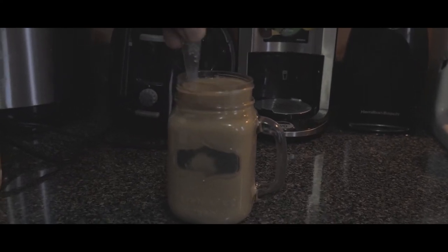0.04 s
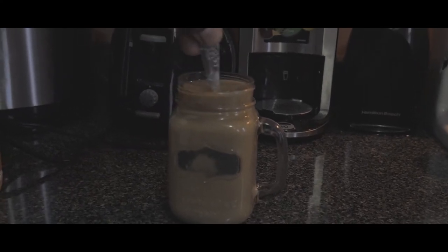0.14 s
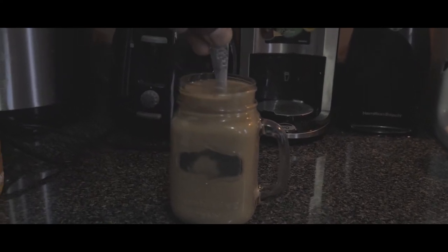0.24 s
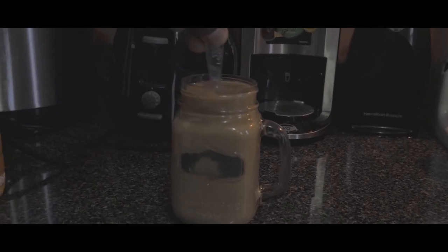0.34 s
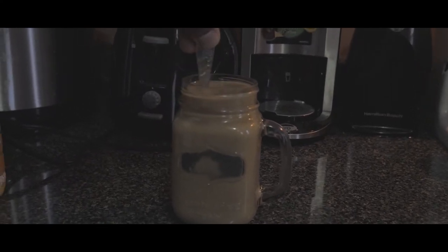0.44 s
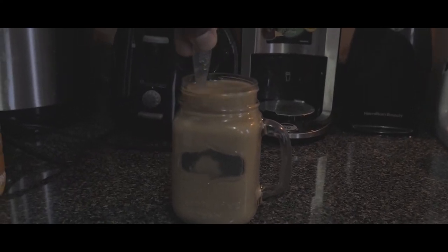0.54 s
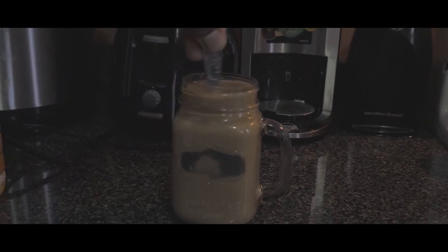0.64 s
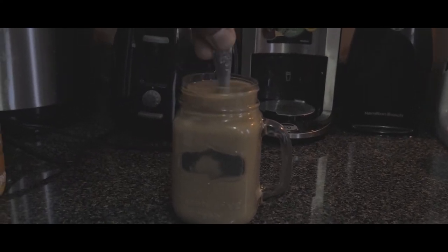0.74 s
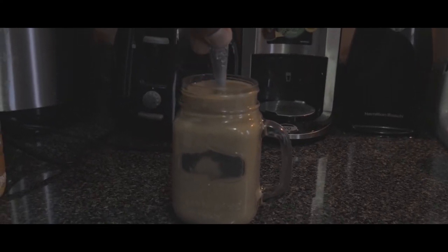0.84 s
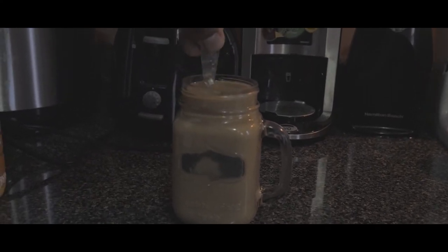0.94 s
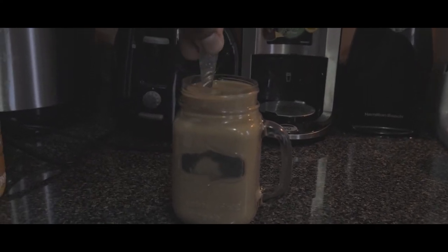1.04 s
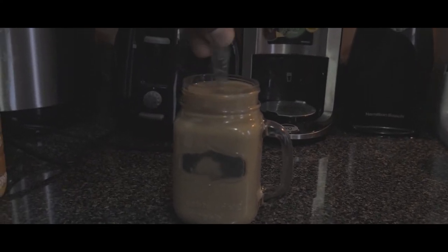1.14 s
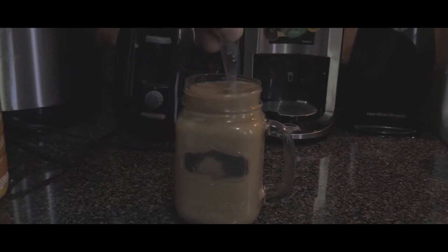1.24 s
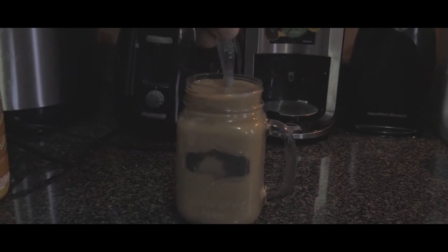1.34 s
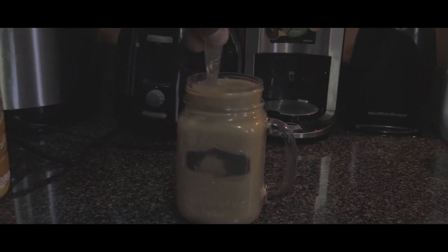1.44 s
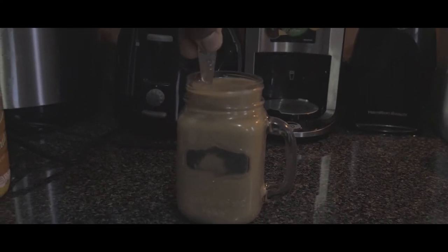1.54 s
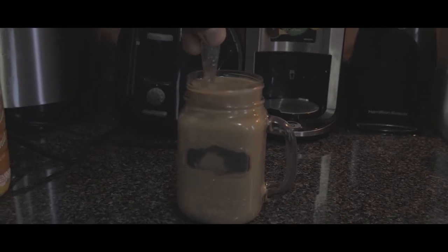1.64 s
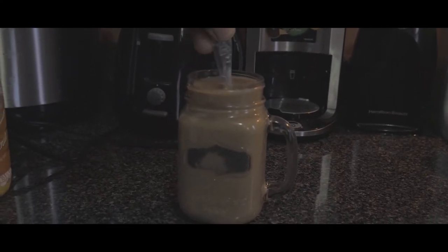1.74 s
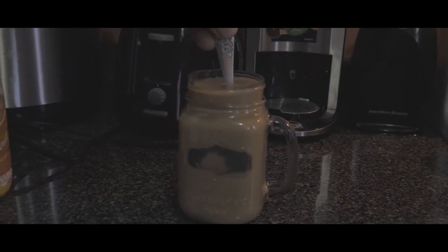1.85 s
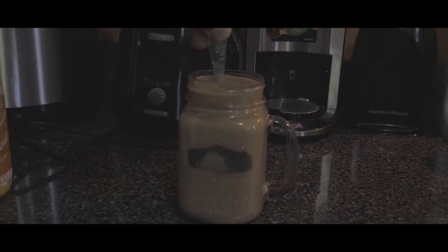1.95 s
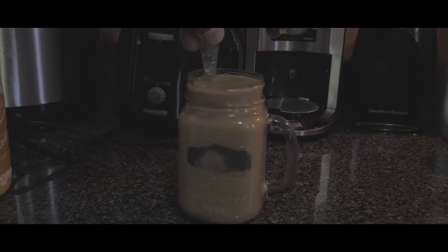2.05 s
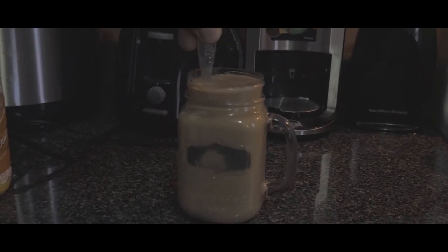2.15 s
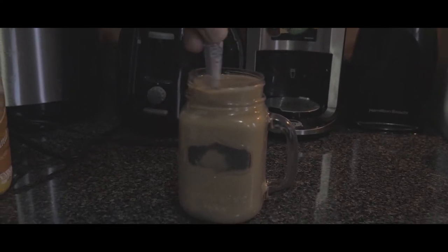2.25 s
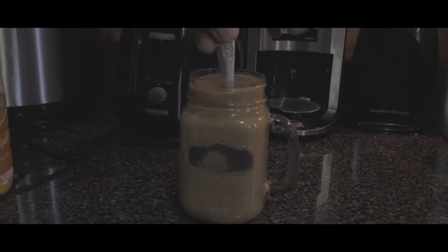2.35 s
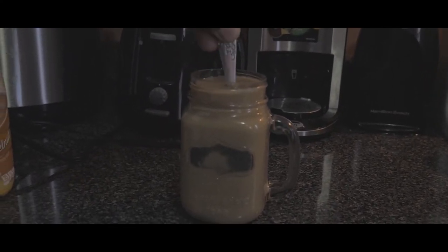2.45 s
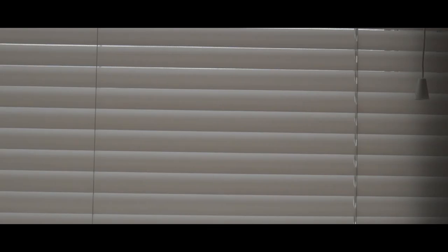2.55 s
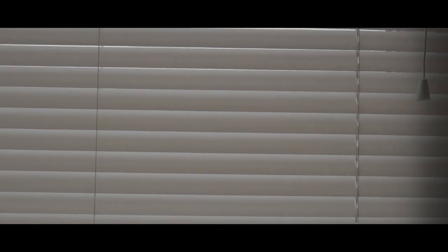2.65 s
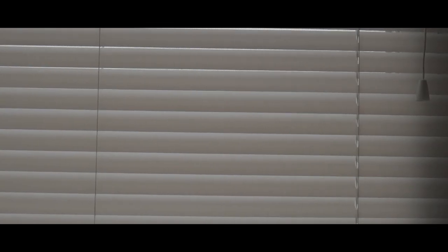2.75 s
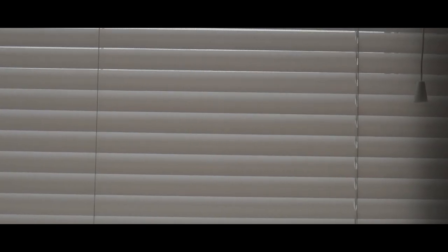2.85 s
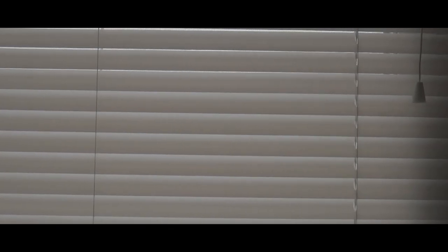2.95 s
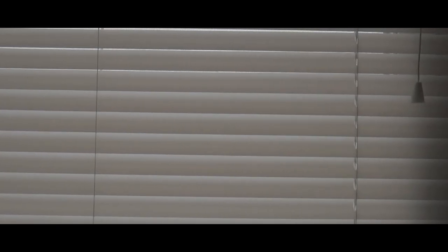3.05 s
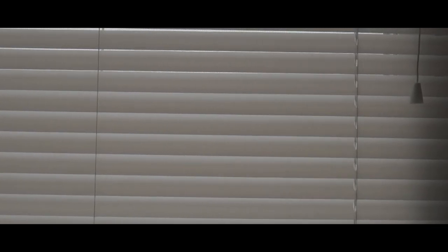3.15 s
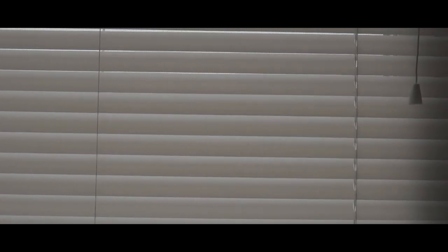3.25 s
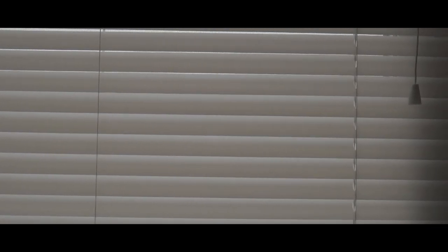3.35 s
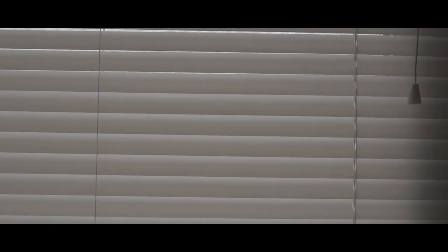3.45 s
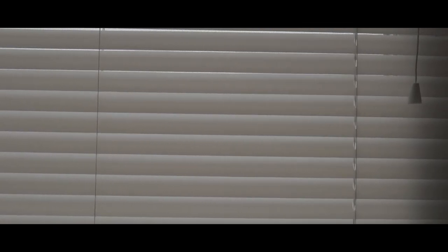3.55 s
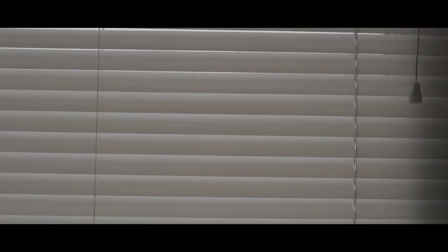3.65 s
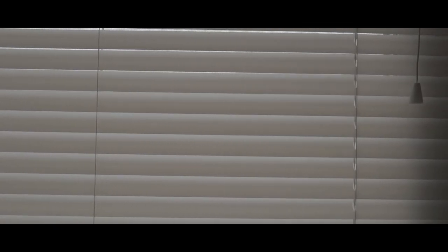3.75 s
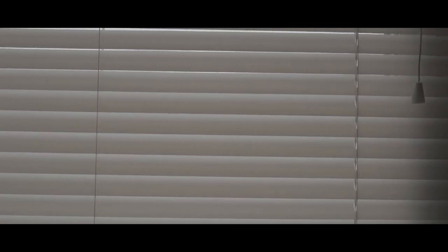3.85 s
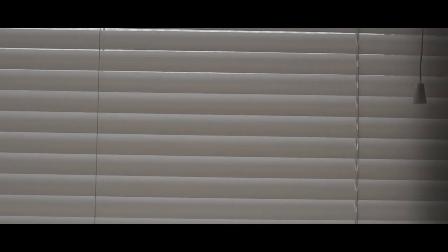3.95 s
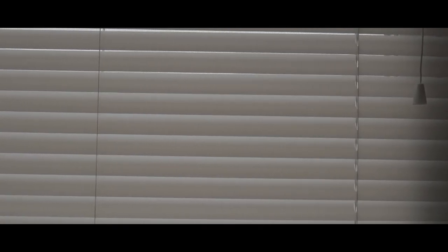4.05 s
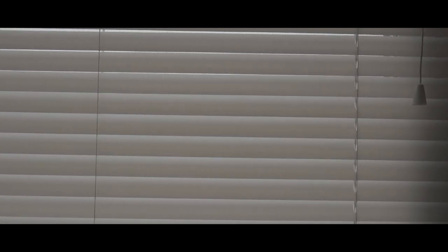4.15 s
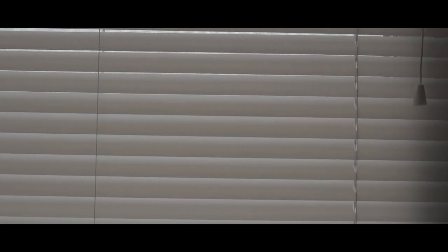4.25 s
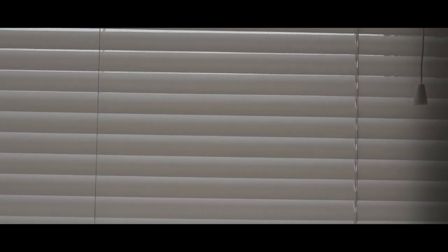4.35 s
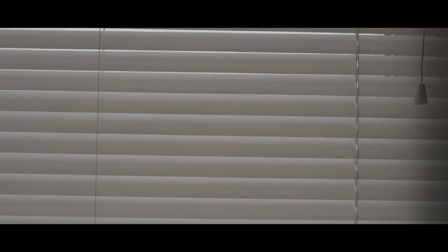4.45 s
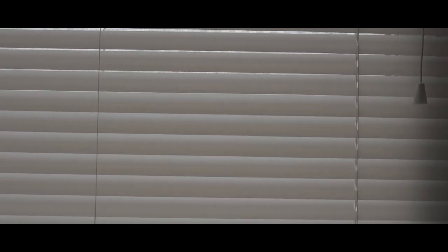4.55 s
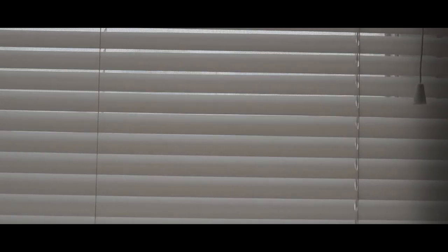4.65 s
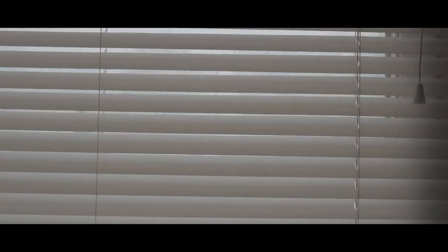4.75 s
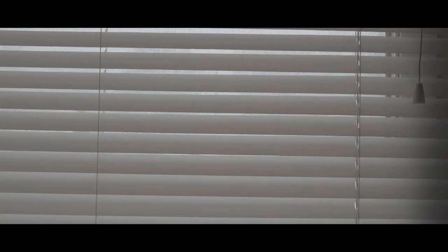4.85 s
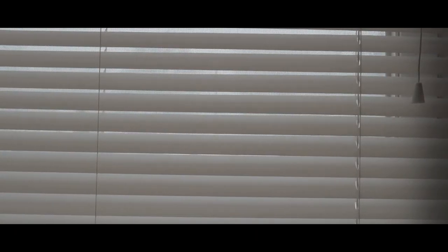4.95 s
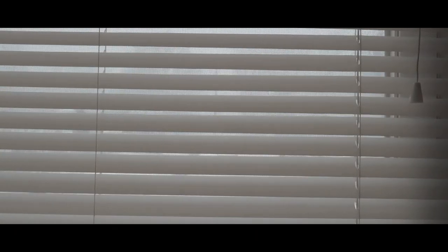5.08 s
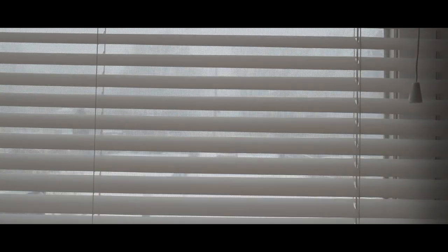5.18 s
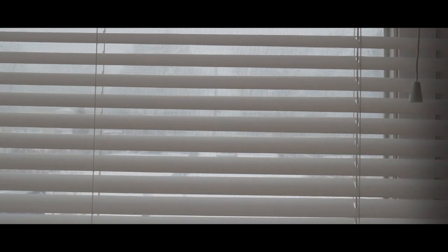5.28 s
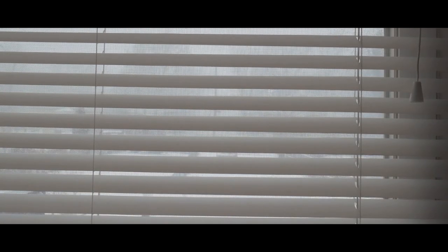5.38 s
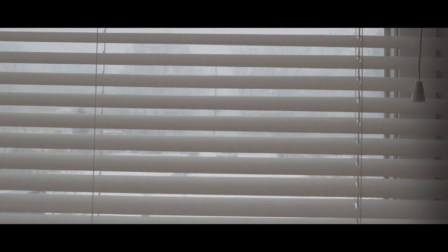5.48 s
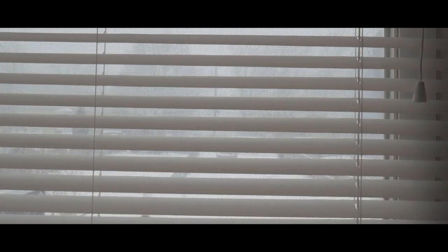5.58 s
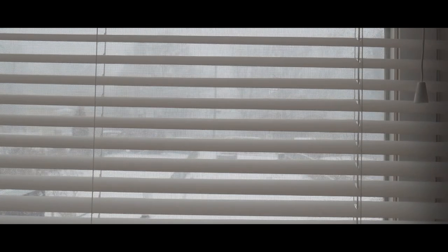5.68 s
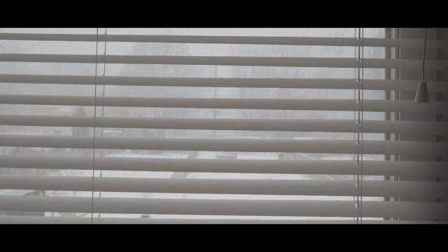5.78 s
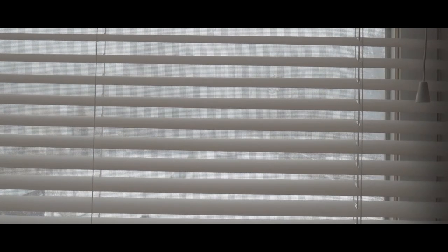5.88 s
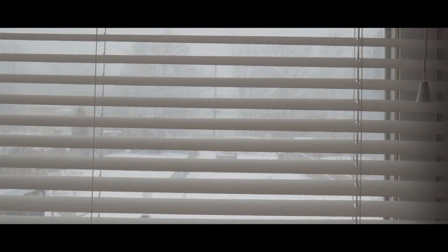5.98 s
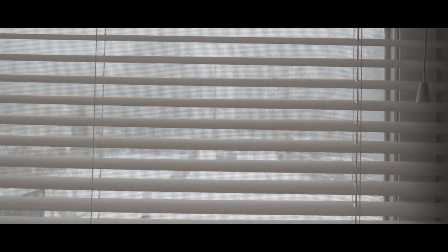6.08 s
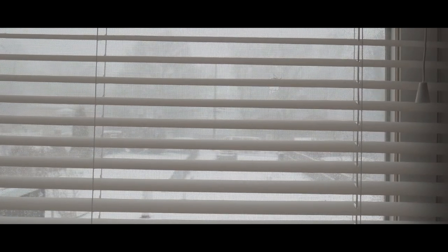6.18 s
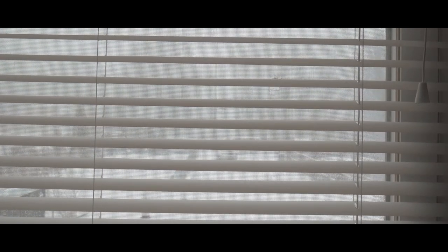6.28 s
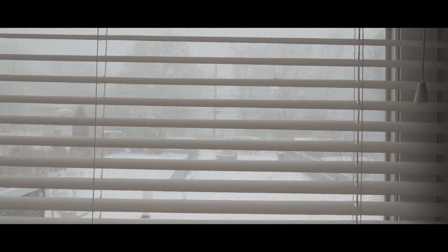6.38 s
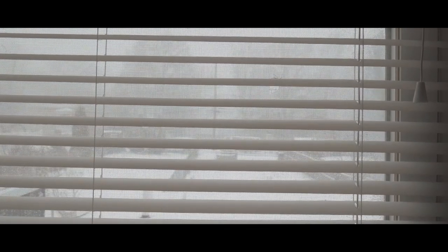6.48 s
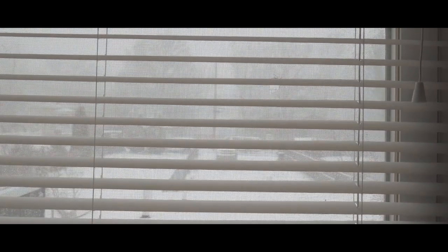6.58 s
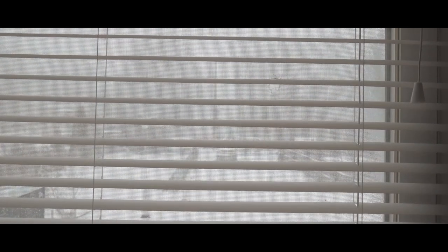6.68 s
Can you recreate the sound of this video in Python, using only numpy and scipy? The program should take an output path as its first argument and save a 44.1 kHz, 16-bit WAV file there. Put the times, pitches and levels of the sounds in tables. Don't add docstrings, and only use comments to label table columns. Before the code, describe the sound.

From 0 to 2.56 s, a metal spoon stirs a full glass mug, close and nearly central. A clink is already ringing at the start; strong, bright clinks follow at about 0.2, 0.5, 0.7, 1.2, 1.5, 1.8, 2.2 and 2.35 s, with weaker taps between. Each has a sharp crack, a short glassy ring and a dull wet knock. Brief gliding scrapes come at 1.1 and, firmer, 1.6 s. Soft sloshing hiss and deep counter rumble swell with the stirring, strongest near 1.8 s. An abrupt cut reveals a far quieter room: low, airy fan hum and a thin steady-pitched whine surging around 2.7-3.35, 4.8-5.1 and 5.65-6.4 s, with short blips between. Faint dry plastic slat ticks fall at 3.0, 3.3, 3.6, 4.5-4.6 and 5.2 s, then cluster from 6.1 to 6.66 s, slightly left, with a small room tail.

```python
import sys
import numpy as np
from scipy import signal
from scipy.fft import rfft, irfft, next_fast_len
from scipy.io import wavfile
from scipy.ndimage import uniform_filter1d, map_coordinates

SR = 44100
rng = np.random.default_rng(int(sys.argv[2]) if len(sys.argv) > 2 else 0)


def gain_from_db(level_db):
    decades = np.asarray(level_db, float) / 20
    return 10 ** decades


def materialize(psi):
    bounded = np.clip(np.atleast_2d(psi).T, -1, 1)
    quanta = np.round(bounded * 32767).astype(np.int16)
    wavfile.write(sys.argv[1], SR, quanta)


N = 296330

# fade_start_s, fade_end_s
SCENE_CHANGE = (2.557, 2.565)

# pitch_hz, level_db per Hz
ROOM_AIR = [(15, -47), (60, -19), (90, -13), (125, 0), (190, -9), (270, -8), (420, -14), (620, -18),
            (1000, -25), (1700, -26), (2800, -31), (5000, -37), (10000, -41), (15400, -47)]
# pitch_hz, likeness (1 = the same)
ROOM_AIR_LIKENESS = [(60, 1), (180, 0.65), (550, 0.06), (1650, 0.61), (4970, 0.68), (15000, 0.84)]
# pitch_hz, left_over_right_db
ROOM_AIR_LEFT = [(60, .3), (240, .9), (950, .5), (3770, 1.2), (15000, 1)]
ROOM_AIR_DB = -49.5
# pitch_hz, width_hz, level_db
FAN_TONES = [(118, 2.1, -100), (243, 15, -71), (2090, 15, -77.5)]
# start_s, length_s, level_db
WHINE_SURGES = [
    (2.707, 0.65, -60),
    (3.924, .03, -68),
    (4.12, .05, -66.5),
    (4.447, .15, -64),
    (4.774, 0.34, -61),
    (5.65, 0.72, -60.5),
    (6.68, 0.091, -61.5),
]
WHINE_REST_DB, WHINE_FADE_DB_PER_S = -71, 94

# time_s, effort_db
STIR_EFFORT = [(0.0, -57), (0.25, -60.5), (0.38, -54), (0.73, -52.5), (0.8, -74), (0.93, -53.5),
               (1.2, -54.5), (1.25, -61), (1.49, -50.5), (1.79, -42), (1.87, -57), (2.32, -51.5),
               (2.57, -57)]
# pitch_hz, level_db per Hz
COUNTER_RUMBLE = [(12, -45.5), (33, -16), (54, 4.5), (74, -2), (97, -11.5), (110, -17), (140, -46.5),
                  (240, -120)]
# pitch_hz, level_db per Hz
KITCHEN_HISS = [(100, -6), (170, -8), (300, -7), (550, -13.5), (1000, -15.5), (1400, -21.5), (3000, -22),
                (7500, -32), (12000, -41.5), (15500, -47.5), (16300, -91.5)]
# pitch_hz, time_to_die_s (60 dB down)
KITCHEN_ECHO = [(200, .3), (1500, 0.56), (4000, 0.56), (9000, 0.33), (15000, .2)]
SLOSH_DB, SLOSH_GROWS = -53, 0.13

# start_s, peak_db, low_part_db, top_part_db
SLAT_TICKS = [(3.037, -50, -5, -28), (3.0494, -61.5, 3.5, -15), (3.1492, -53.5, 0.5, -12),
              (3.3079, -41.5, -3, -18), (3.6212, -50, -23, -23), (4.1214, -66, 3.5, -13.5),
              (4.4982, -48.5, -5, -13.5), (4.5184, -56, 3.5, -13), (4.585, -39, -6, -8.5),
              (4.7466, -58.5, 0, -14), (4.8344, -58.5, -19.5, -8), (5.0274, -64.5, -2.5, -22.5),
              (5.2394, -47.5, -8.5, -5), (5.8874, -55, 0.5, -16), (6.0931, -46.5, -28.5, -2.5),
              (6.1205, -52, -25, -5.5), (6.2544, -53, -1.5, -5), (6.2961, -43.5, -8, -13),
              (6.3634, -62.5, 3, -3), (6.3994, -54.5, -17, -12), (6.4527, -45.5, 6, -0.5),
              (6.5834, -72, 8.5, -15), (6.6428, -55.5, -3, -15.5), (6.6594, -59, -7.5, 4)]
# pitch_hz, width_hz, level_db
SLAT_TONES = [(1633, 380, 1), (4006, 280, 5.5), (5960, 130, -1), (7600, 150, -11), (10300, 260, 2.5)]
# pitch_hz, time_to_die_s (60 dB down)
ROOM_ECHO = [(500, 0.21), (4000, 0.6), (12000, 0.157)]
TICK_DIES_S, TICK_LEFT_DB = 0.029, 2.5

# time_s, pressure_db, lean_db (from stem to bowl)
SPOON_DRAGS = [
    [(1.102, -52, -4.5), (1.113, -35, -7.5), (1.125, -32.5, 0.5), (1.155, -34, 4), (1.205, -49.5, 3)],
    [(1.585, -36.5, -5.5), (1.63, -33, -11), (1.645, -35, -3.5), (1.68, -26.5, 0), (1.715, -30, 2),
     (1.785, -49.5, -6)],
]
# pitch_hz, width_hz, level_db
EDGE_TONES = [(690, 97, 4.5), (1455, 600, -1), (3340, 79, 9), (3773, 130, 1.5), (4970, 90, 0.5),
              (6200, 70, 2.5), (7700, 390, -9), (8700, 200, -7.5), (10700, 300, -11.5), (12900, 250, -17.5),
              (14200, 250, -19)]
BOWL_HZ, BOWL_SAG_HZ_PER_S, STEM_HZ, STEM_SAG_HZ_PER_S = 1190, 350, 1960, 1100
FIZZ_DB, FIZZ_LEAN, WALL_DB, WALL_RING_S = -3, .8, 1.5, .06

# start_s, belly_db, second_belly_over_first_db, rim_db, knock_db
SPOON_CLINKS = [(-0.015, -29.5, 10.5, -24.5, -27.5), (0.1104, -64, -1.5, -62.5, -62.5),
                (0.1966, -16, -4.5, -3, -33), (0.4816, -10.5, -1, -17.5, -21),
                (0.5082, -21.5, -19, -26.5, -29), (0.5912, -21, -5.5, -29.5, -21),
                (0.7249, -14.5, -4, -3.5, -29), (0.961, -40, 0.5, -28.5, -30),
                (1.0201, -38.5, -7, -41, -28), (1.2196, -14.5, -7.5, -1.5, -29),
                (1.5, -15.5, 4.5, -14.5, -24.5), (1.5642, -17.5, 3, -13.5, -12.5),
                (1.8021, -12.5, -13.5, -5, -29.5), (2.047, -37, 2.5, -26.5, -21.5),
                (2.2121, -11.5, -8, -21, -19), (2.3301, -17.5, -12, -16.5, -19.5),
                (2.365, -16, 1.5, -4.5, -36.5)]
MUG_HZ = [2326, 2643, 3643, 3797, 4398, 4445, 4823, 5484, 5737, 5920, 6130, 6406, 6472, 6689, 7400, 7890,
          8054, 8355, 8580, 8765, 9200, 10060, 10860, 11400, 12250, 12800, 13400, 13850]
# level_db (within its family), time_to_die_s (60 dB down)
MUG_RINGS = [(-4, 0.34), (-11, 0.51), (2, 0.2), (-8, 0.4), (-10, 0.27), (-3, 0.31), (-20.5, .15),
             (-2, 0.14), (-9.5, 0.12), (-6.5, 0.33), (-6.5, 0.15), (-9.5, 0.26), (3, .2), (-4.5, 0.21),
             (-21, .2), (-18.5, 0.13), (-7, 0.084), (-14, 0.16), (-15, 0.088), (-7.5, 0.14), (-24.5, .2),
             (-20.5, 0.12), (-25.5, 0.3), (-32.5, .18), (-28, .15), (-35, .15), (-32, .1), (-31.5, .12)]
# pitch_hz, width_hz, level_db
WET_SPOON = [(255, 180, -18.5), (400, 66, -16), (643, 110, -11.5), (1008, 81, -8.5), (1267, 120, -12),
             (1330, 90, -10), (1743, 37, 0), (1775, 20, -4.5), (1877, 60, 1.5)]
# pitch_hz, width_hz, level_db
DRY_HANDLE = [(3400, 90, -2), (5290, 60, -3), (6040, 28, -1.5)]
# pitch_hz, width_hz, level_db
CLINK_SHEEN = [(3030, 800, -2.5), (3700, 300, -4.5), (4160, 200, -4), (5916, 200, -3), (6100, 220, 0.5),
               (5860, 560, 2.5), (7320, 880, -10), (7820, 230, 0.5), (8680, 250, 1), (10500, 82, -15),
               (10630, 540, -7.5), (12250, 80.6, -20.5), (13600, 180, -20)]
# pitch_hz, level_db per Hz
CRACK_COLOUR = [(88, -58.5), (150, -36), (1110, -24.5), (2940, -4), (4110, -14), (6320, 5.5), (7100, -17.5),
                (8640, 2.5), (9530, -12.5), (14400, -27.5), (16200, -32.5)]
CRACK_DIES_S = .0045
CRACK_DB, CRACK_GROWS, MIDDLING_DB = -2, 1.2, -12


def unit(x):
    return x / np.sqrt(np.mean(x ** 2) + 1e-20)


def peak_one(x):
    return x / (np.abs(x).max() + 1e-20)


def along(points, hz):
    point_hz, value = np.transpose(points)
    return np.interp(np.log(hz + 1), np.log(point_hz + 1), value)


def curves(rows):
    time_s, *columns = np.transpose(rows)
    return [np.interp(np.arange(N) / SR, time_s, column, -150, -150) for column in columns]


def wobble(rate):
    knots = rng.standard_normal(int(N * rate / SR) + 4)
    return map_coordinates(knots, [np.arange(N) * rate / SR])


def filtered(x, response):
    n = x.shape[-1]
    m = next_fast_len(n + 8192)
    return irfft(rfft(x, m) * response(np.fft.rfftfreq(m, 1 / SR)), m)[..., :n]


def resonances(modes):
    def response(f):
        total = 0
        for k, (hz, width, db) in enumerate(modes):
            total = total + (-1) ** k * gain_from_db(db) * 1j * f * width / (hz * hz - f * f + 1j * f * width)
        return total
    return response


def narrow(hz, width_hz):
    slow = filtered(rng.standard_normal((2, N)), lambda f: 1 / (1 + (2 * f / width_hz) ** 2))
    turn = 2 * np.pi * np.cumsum(hz * np.ones(N)) / SR
    return unit(slow[0] * np.cos(turn) + slow[1] * np.sin(turn))


def add(track, s, x):
    track[..., SR + round(s * SR):][..., :x.shape[-1]] += x


def echo(x, decays, channels):
    hz, t, z = signal.stft(rng.standard_normal((channels, SR // 2)), SR, nperseg=256)
    fading = z * gain_from_db(-60 * t / along(decays, hz)[:, None])
    tail = signal.istft(fading, SR, nperseg=256)[1]
    late = np.pad(x, (250, 0))[None]
    return signal.fftconvolve(late, tail / np.linalg.norm(tail[0]), axes=1)[:, :len(x)]


def surging():
    t = np.arange(N) / SR
    held = []
    for s, length, db in WHINE_SURGES:
        outside_s = np.maximum(np.abs(t - s - length / 2) - length / 2, 0)
        held.append(db - WHINE_FADE_DB_PER_S * outside_s)
    return np.maximum(np.max(held, axis=0), WHINE_REST_DB)


def quiet_room():
    def turn(hz):
        return np.arccos(np.clip(along(ROOM_AIR_LIKENESS, hz), -1, 1)) / 2

    def shape(hz):
        dip = 1 - 0.34 * np.exp(-((hz - 7870) / 60) ** 2)
        return gain_from_db(along(ROOM_AIR, hz)) * dip * (hz < 15500) * [np.cos(turn(hz)), np.sin(turn(hz))]

    z = signal.stft(rng.standard_normal((2, N)), nperseg=512)[2]
    patches = uniform_filter1d(rng.standard_normal(z.shape[1:]), size=14, axis=0)
    patches = uniform_filter1d(patches, size=30, axis=1)
    uneven = signal.istft(z * gain_from_db(unit(patches)), nperseg=512)[1][:, :N]
    mid, side = filtered(uneven, shape)
    left_right = np.array([mid + side, mid - side])
    air = filtered(left_right, lambda hz: gain_from_db(along(ROOM_AIR_LEFT, hz) * [[.5], [-.5]]))
    fan = sum(gain_from_db(db) * narrow(hz, width) for hz, width, db in FAN_TONES)
    whine_db = surging() + 1.64 * wobble(7.7) + [[2], [2]]
    whine = gain_from_db(whine_db) * np.sin(2 * np.pi * np.cumsum(756 + 3 * wobble(11)) / SR)
    air_db = ROOM_AIR_DB - 2.5 + .5 * wobble(3) + wobble(12)
    return gain_from_db(air_db) * unit(air) + fan + whine


def counter():
    effort_db, = curves(STIR_EFFORT)
    slosh_db = SLOSH_DB + SLOSH_GROWS * (effort_db - np.mean(STIR_EFFORT, 0)[1])
    rumble = unit(filtered(rng.standard_normal(N), lambda f: gain_from_db(along(COUNTER_RUMBLE, f))))
    hiss = unit(filtered(rng.standard_normal(N), lambda f: gain_from_db(along(KITCHEN_HISS, f))))
    return gain_from_db(effort_db + 1.5 * wobble(3)) * rumble + gain_from_db(slosh_db + 2.5 * wobble(22)) * hiss


def slats():
    out, t = np.zeros((2, N + 2 * SR)), np.arange(SR // 4) / SR
    sides = gain_from_db([[TICK_LEFT_DB / 2], [-TICK_LEFT_DB / 2]])
    for s, db, low_db, top_db in SLAT_TICKS:
        colour = [(500, low_db + 4), (1400, low_db + 12.5), (2800, low_db),
                  (5500, 0), (11000, top_db), (15000, top_db - 10)]

        def slat(f):
            return gain_from_db(along(colour, f)) * (1 + 0.22 * resonances(SLAT_TONES)(f))

        burst = rng.standard_normal(len(t)) * gain_from_db(-60 * t / TICK_DIES_S) * (1 - np.exp(-t / 0.00039))
        tick = gain_from_db(db + 6.5 + max(low_db + 6.5, 0)) * peak_one(filtered(burst, slat))
        add(out, s, tick * sides + gain_from_db(-6) * echo(tick, ROOM_ECHO, channels=2))
    return out[:, SR:SR + N]


def drags():
    out = np.zeros(N)
    for rows in SPOON_DRAGS:
        press_db, lean_db = curves(rows)
        lean_db = np.where(press_db > -100, lean_db, 0)
        levels_db = press_db + [lean_db, -lean_db, WALL_DB + 0 * lean_db, FIZZ_DB + FIZZ_LEAN * lean_db]
        bowl, stem, wall, fizz = uniform_filter1d(gain_from_db(levels_db), size=300)
        wall = np.abs(filtered(wall, lambda f: 1 / (1 + 2j * np.pi * f * WALL_RING_S)))
        moved_s = np.clip(np.arange(N) / SR - rows[0][0], 0, 1)
        bowl_tone = narrow(BOWL_HZ - BOWL_SAG_HZ_PER_S * moved_s, width_hz=90)
        stem_tone = narrow(STEM_HZ - STEM_SAG_HZ_PER_S * moved_s, width_hz=80)
        scrape = rng.standard_normal(N) * gain_from_db(3 * wobble(150))
        out += bowl * gain_from_db(3 * wobble(70) - 1.5) * bowl_tone
        out += stem * gain_from_db(3 * wobble(70) - 2) * stem_tone
        out += wall * narrow(MUG_HZ[0], width_hz=15)
        out += fizz * unit(filtered(scrape, resonances(EDGE_TONES)))
    return out + gain_from_db(-14.5) * echo(out, KITCHEN_ECHO, channels=1)[0]


def mug_pairs(t):
    hz = np.array(MUG_HZ)[:, None]
    level_db, dies_s = np.array(MUG_RINGS).T[:, :, None]
    split = 1 + .0022 * np.array([[[0]], [[1]]])
    lasting_s = dies_s * np.array([[[.7]], [[1.5]]])
    rise = 1 - np.exp(-(t / (.005 * (2326 / hz) ** 2)) ** 2)
    return np.sin(2 * np.pi * hz * split * t) * gain_from_db(level_db - 60 * t / lasting_s) * rise


def clinks():
    out, t = np.zeros(N + 2 * SR), np.arange(SR // 2) / SR
    pairs = mug_pairs(t)
    hz = np.array(MUG_HZ)
    family = np.select([hz == MUG_HZ[0], hz == MUG_HZ[2]], [0, 1], 2)
    for s, belly_db, second_db, rim_db, knock_db in SPOON_CLINKS:
        luck = gain_from_db(3 * rng.standard_normal(pairs.shape[:2]) + [[0], [-8]])
        belly, second, rim = [peak_one(np.tensordot(luck * (family == k), pairs, 2)) for k in range(3)]
        ring = gain_from_db(belly_db) * belly + gain_from_db(belly_db + second_db - 1.5) * second + gain_from_db(rim_db - 5) * rim
        grit = rng.standard_normal(len(t))
        snap = grit * gain_from_db(-60 * t / CRACK_DIES_S)
        crack = peak_one(filtered(snap, lambda f: gain_from_db(along(CRACK_COLOUR, f))))
        push = grit * gain_from_db(-60 * t / 0.025) * (1 - np.exp(-t / 0.0016))
        knock = peak_one(filtered(push, lambda f: resonances(WET_SPOON)(f) / (1 + 1j * f / 2500) ** 2))
        sheen = peak_one(filtered(grit * gain_from_db(-60 * t / 0.09), resonances(CLINK_SHEEN)))
        handle = peak_one(filtered(push, resonances(DRY_HANDLE)))
        body = ring + gain_from_db((knock_db + rim_db) / 2 - 2.5) * handle
        body = body + gain_from_db(knock_db + 4.0) * knock + gain_from_db(rim_db - 5.5) * sheen
        room = gain_from_db(-8) * echo(body, KITCHEN_ECHO, channels=1)[0]
        crack_db = CRACK_DB + CRACK_GROWS * (rim_db - MIDDLING_DB)
        add(out, s, body + gain_from_db(crack_db) * crack + room)
    return out[SR:SR + N]


def scene():
    fade = np.interp(np.arange(N) / SR, SCENE_CHANGE, [1, 0])
    kitchen = clinks() + drags() + counter()
    mismatch = gain_from_db(-33.0 + 5.5 * wobble(12)) * wobble(210)
    first = fade * kitchen * (1 + mismatch * [[1], [-1]])
    return first + (1 - fade) ** 3 * (slats() + quiet_room())


def low_pass(x):
    return signal.sosfilt(signal.butter(12, 16320, fs=SR, output="sos"), x)


def record(dry):
    clipped = dry / (1 + np.abs(dry / 1.05) ** 8) ** (1 / 8)
    return low_pass(clipped)


dry = scene()
out = record(dry)
materialize(out)
```